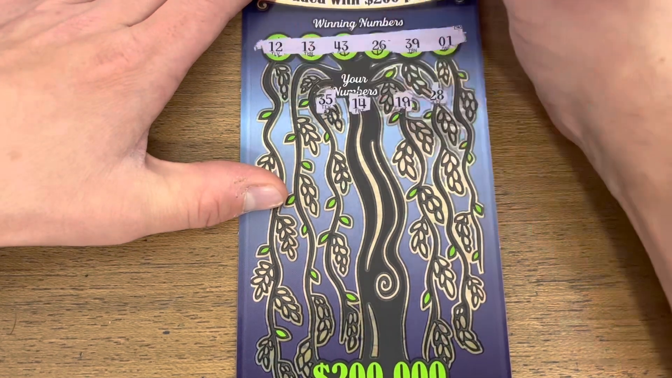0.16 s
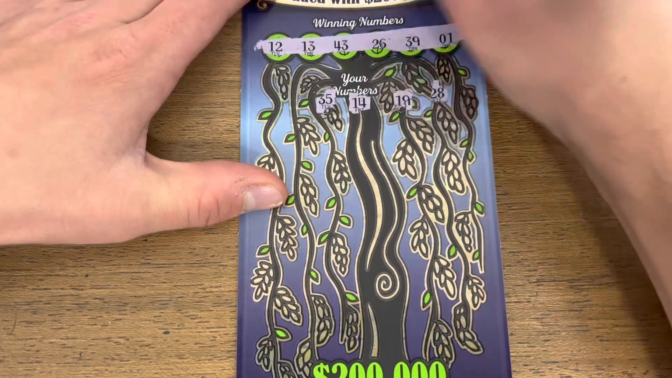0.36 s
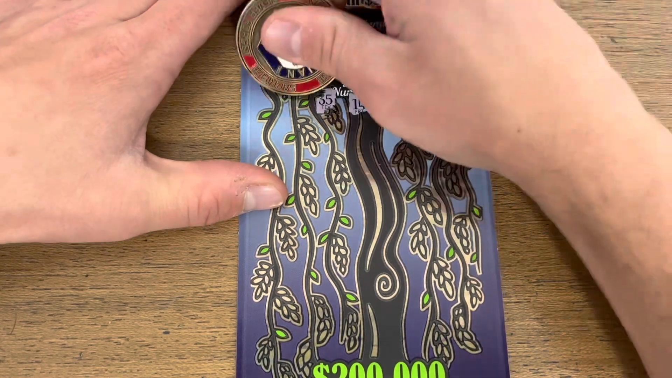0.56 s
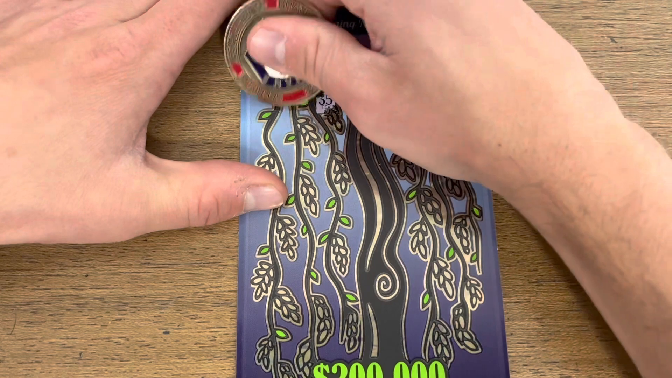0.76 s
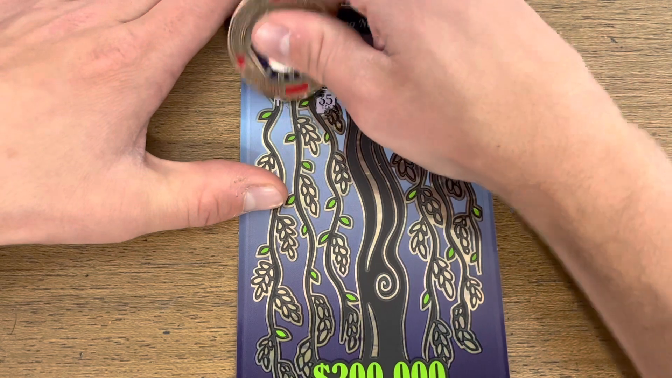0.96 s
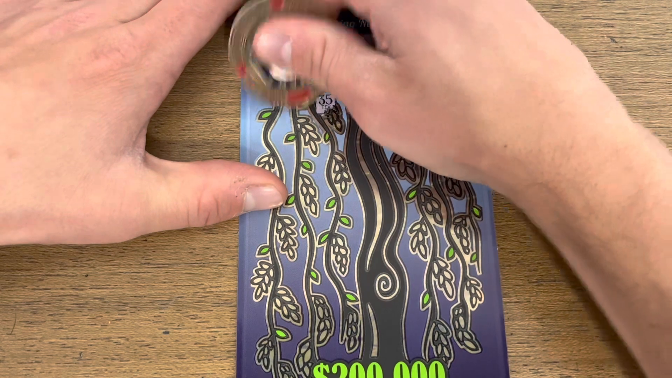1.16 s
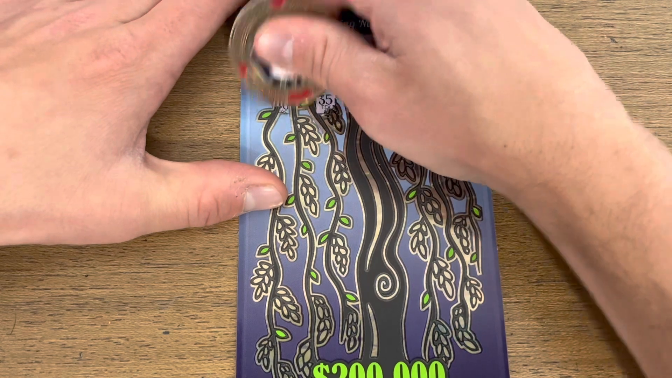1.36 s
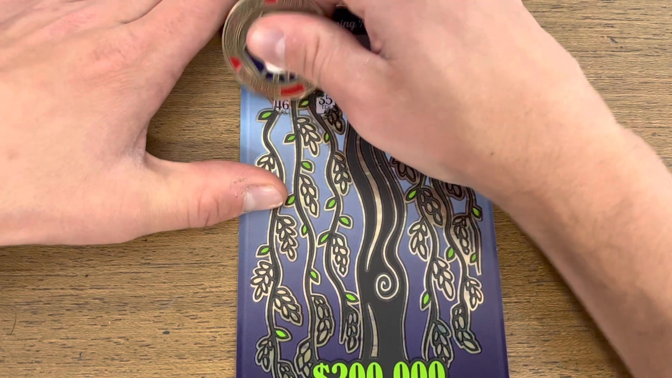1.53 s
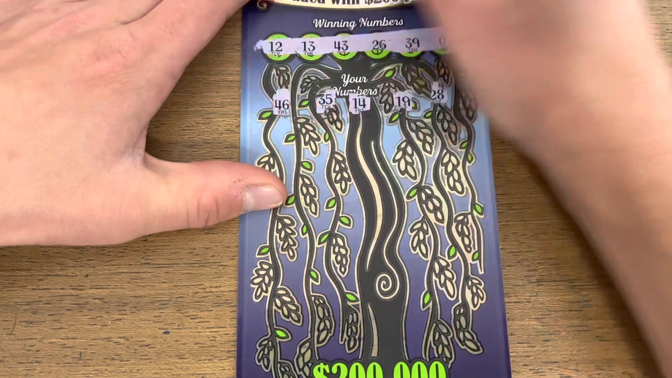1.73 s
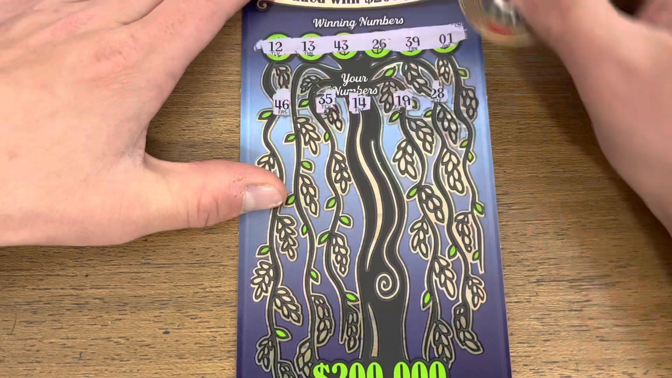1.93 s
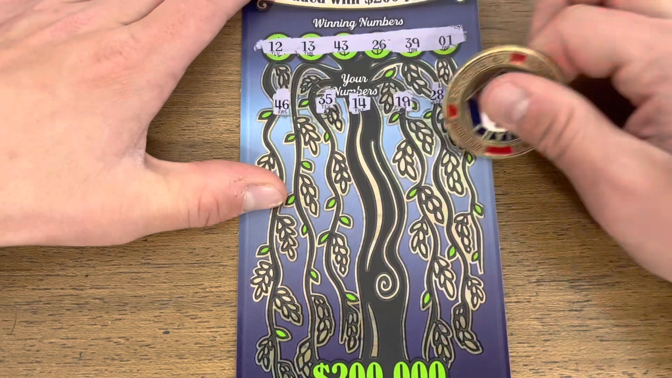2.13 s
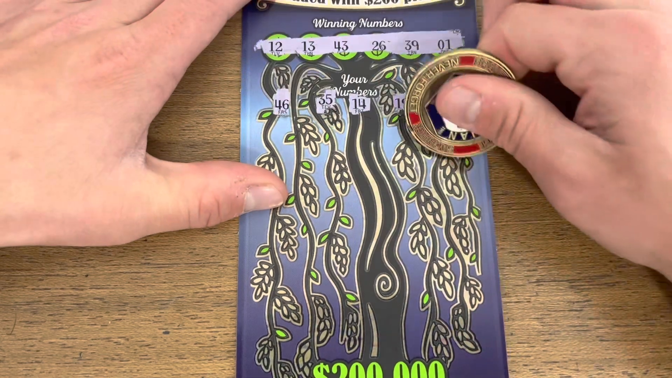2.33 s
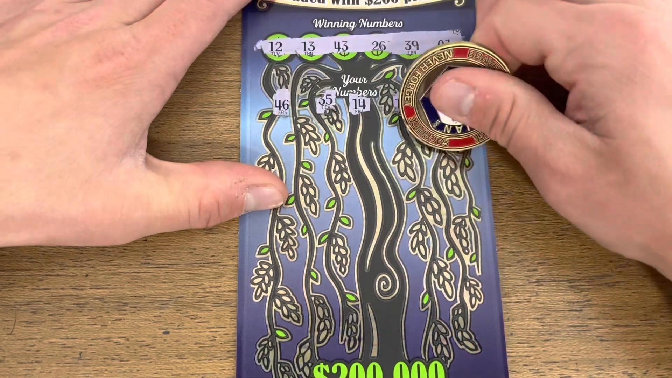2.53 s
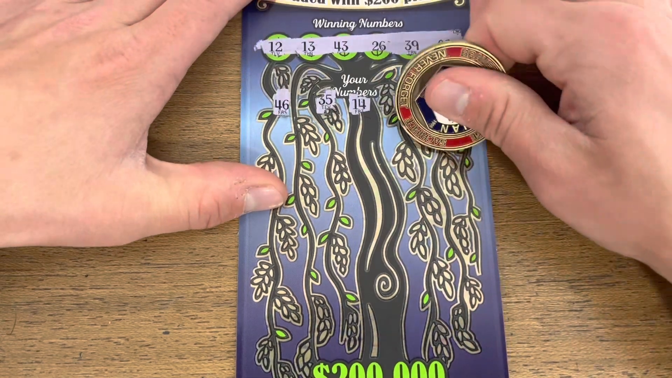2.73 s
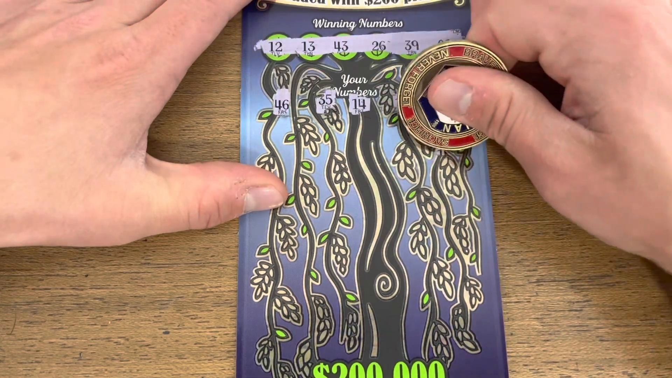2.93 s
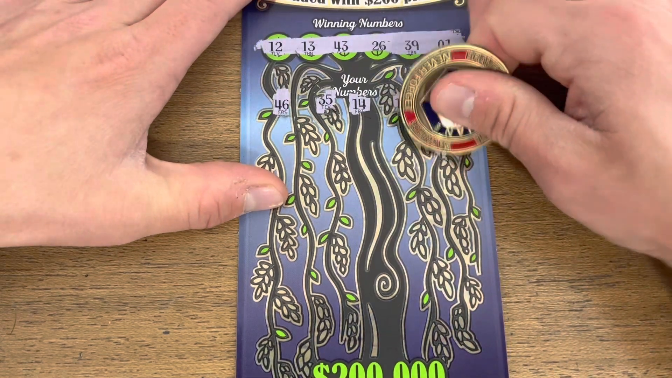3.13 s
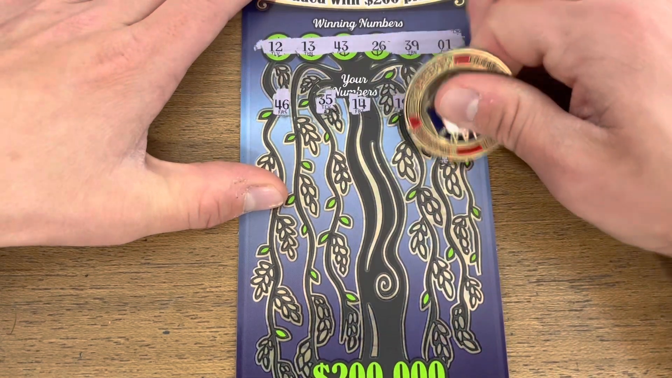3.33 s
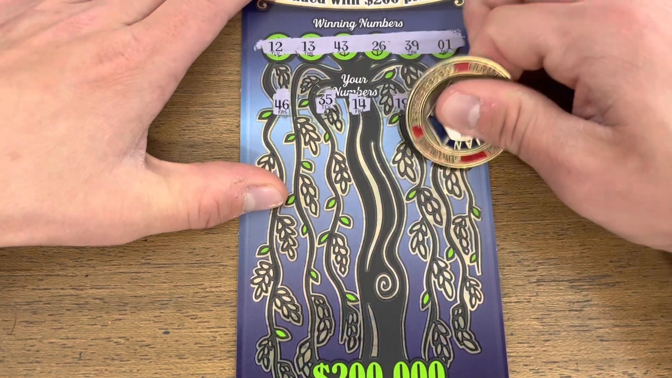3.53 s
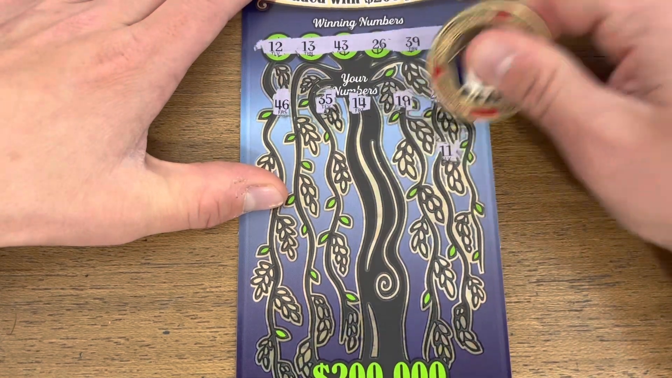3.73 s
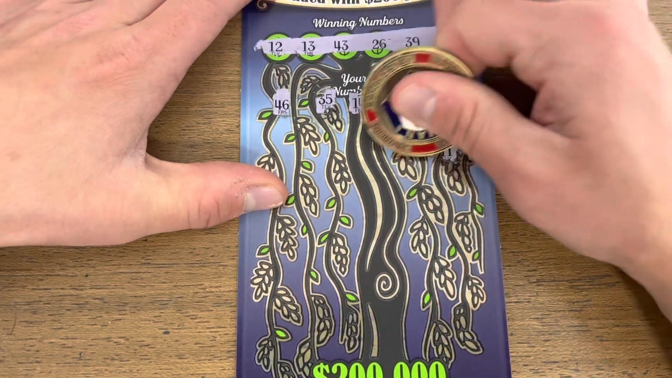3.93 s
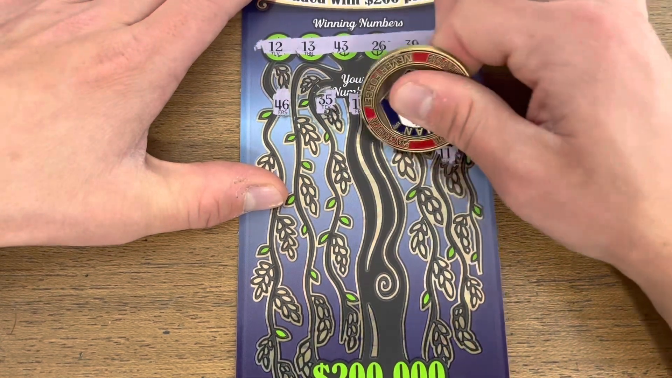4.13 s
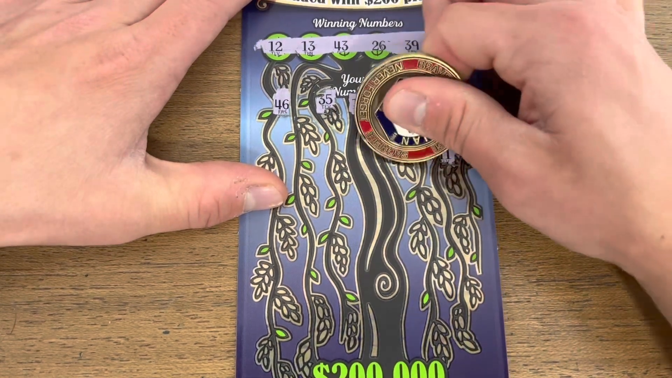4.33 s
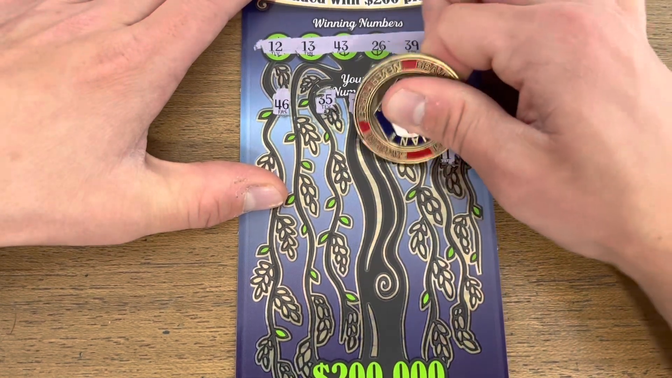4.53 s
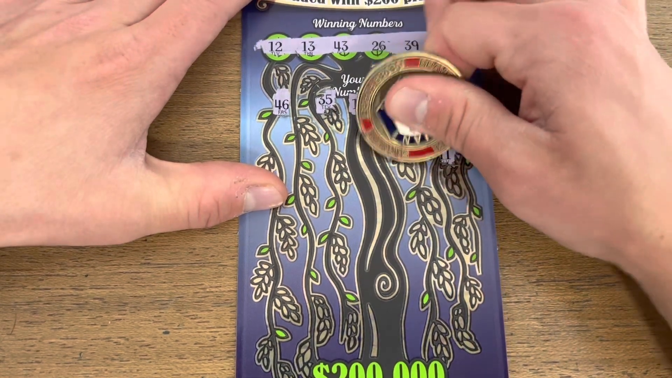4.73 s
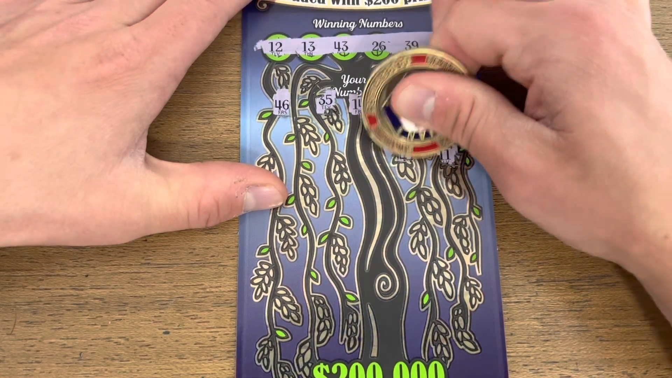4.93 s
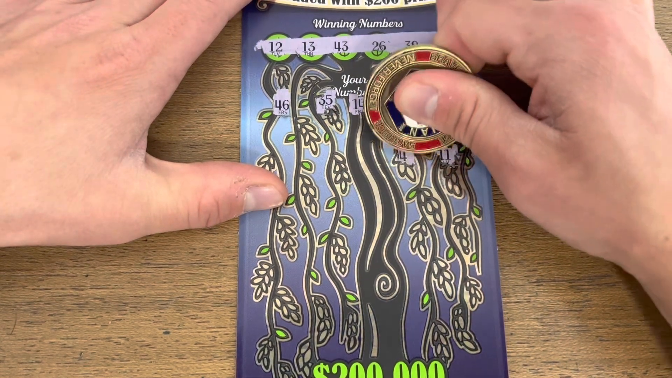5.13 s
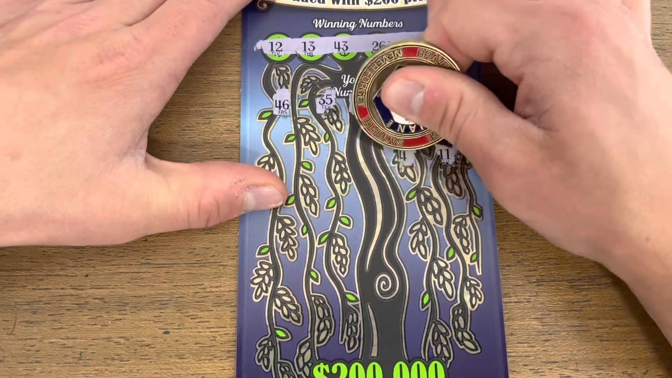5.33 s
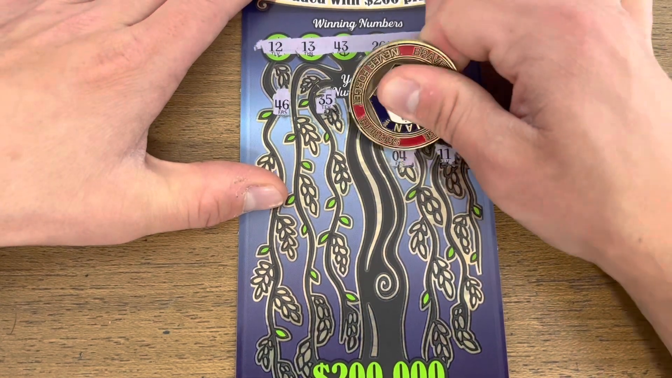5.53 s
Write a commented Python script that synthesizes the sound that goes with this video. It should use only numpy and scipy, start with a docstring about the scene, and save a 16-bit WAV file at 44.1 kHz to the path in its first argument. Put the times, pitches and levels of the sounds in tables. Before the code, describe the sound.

Close, dry, gritty scratching of a metal coin on paper card over wood, in rapid alternating strokes, broken by pauses with soft hand brushing.

```python
"""Coin scratching a lottery ticket

Three bouts of back-and-forth strokes on a paper ticket on a wooden table, in a small room, with a phone close by.
The rim sticks and slips: random kicks ring the modes of table and card, and the coating crumbles as a fine hiss.
Pulls dig in and drum the table, pushes rasp on the card; the hand brushes crumbs away with a hush of noise,
shifts the coin in its fingers with damped clicks and slides, and sets it down again with short knocks."""
import sys
import numpy as np
from scipy import signal
from scipy.fft import rfft, irfft
from scipy.io import wavfile

SR = 44100
rng = np.random.default_rng(int(sys.argv[2]) if len(sys.argv) > 2 else 0)


def digitize_waveform(pressure):
    """Quantize a signal to 16-bit integers and store it at the path in sys.argv[1].

    Rows of a 2-D input are taken as channels; values are limited to [-1, 1].
    """
    field = np.atleast_2d(pressure).T
    bounded = np.clip(field, -1, 1)
    quanta = np.round(bounded * 32767).astype(np.int16)
    wavfile.write(sys.argv[1], SR, quanta)


N = 250047  # samples in the scene
TAPS = 1024  # samples in a short response


def undb(db):
    """Decibels to gain."""
    return 10 ** (np.asarray(db) / 20)


def unit(x):
    """Scale to an energy of one."""
    return x / np.sqrt(np.sum(x ** 2) + 1e-18)


def on_bins(points, size):
    """A (pitch_hz, value) table read at the frequencies of a transform."""
    hz, value = np.transpose(points)
    bin_hz = np.arange(size // 2 + 1) * SR / size
    return np.interp(np.log(bin_hz + 1), np.log(hz), value)


def colour(x, points):
    """Filter by a (pitch_hz, level_db) table without shifting phase."""
    size = x.shape[-1]
    return irfft(rfft(x) * undb(on_bins(points, size)), size)


def response(points):
    """The causal impulse response of a (pitch_hz, level_db) table, scaled to an energy of one."""
    cepstrum = irfft(np.log(undb(on_bins(points, TAPS))))
    # folding the cepstrum forward gives minimum phase
    cepstrum[1:TAPS // 2] *= 2
    cepstrum[TAPS // 2 + 1:] = 0
    return unit(irfft(np.exp(rfft(cepstrum))))


def walk(size, rate):
    """Smooth chance around zero, with rate new random knots a second."""
    knots = rng.standard_normal(size // 20 + 2)
    return np.interp(np.arange(size) * rate / SR, np.arange(len(knots)), knots)


def grains(size, rate, spread_db):
    """Clicks at random moments, about rate a second, of very unequal size."""
    struck = rng.random(size) < rate / SR
    return struck * undb(spread_db * rng.standard_normal(size))


def grit(size, rate, spread_db):
    """Grains that push and pull alike."""
    return grains(size, rate, spread_db) * rng.choice([-1, 1], size)


def arch(length, power, skew=1):
    """Speed of a short movement: up from rest and back, fastest early when skew is below one."""
    size = int(length * SR)
    progress = (np.arange(size) + .5) / size
    return np.sin(np.pi * progress ** skew) ** power


def chatter(decay_s):
    """A contact that rattles to rest: noise that falls away exponentially."""
    return unit(rng.standard_normal(TAPS) * np.exp(-np.arange(TAPS) / (decay_s * SR)))


def linger(x, decay_s):
    """Give every part of a control an exponential tail."""
    return signal.lfilter([1], [1, -np.exp(-1 / (decay_s * SR))], np.pad(x, (0, TAPS)))


def add(out, s, force, ring, db, length):
    """Sound a force through a response at time s, with the energy of db held for length seconds."""
    sound = unit(signal.fftconvolve(force, ring)) * undb(db) * np.sqrt(length * SR)
    start = max(int(s * SR), 0)
    out[start:start + len(sound)] += sound[:max(N - start, 0)]


def spread(mid, side, apart_hz):
    """Left and right from mid and side; long waves reach both ports alike."""
    side = signal.sosfilt(signal.butter(2, apart_hz, "high", fs=SR, output="sos"), side)
    return mid + side * np.array([[1], [-1]])


# Colour of the quiet room: pitch_hz, level_db (relative)
ROOM_TONE_COLOUR = [(20, -16), (35, 7.5), (58, 16), (90, 1.5), (128, 4.5), (200, -6.5), (450, -21),
                    (1000, -28.5), (2300, -34), (3500, -33.5), (6000, -37.5), (13000, -32), (15000, -48)]
ROOM_TONE_DB = -56.5


def room_tone():
    """A low, almost steady rumble under a faint hiss: coloured noise, wider in the treble."""
    mid, side = rng.standard_normal((2, N))
    tone = colour(spread(mid, 0.51 * side, apart_hz=248), ROOM_TONE_COLOUR)
    return unit(tone) * np.sqrt(2 * N) * undb(ROOM_TONE_DB + 0.3 * walk(N, rate=5))


# The side of the hand sweeps crumbs off the card: start_s, length_s, level_db
HAND_SWEEPS = [(0, 0.095, -64.5), (1.619, 0.53, -59), (3.746, 0.14, -66.5)]
# Colour of skin on card: pitch_hz, level_db (relative)
SKIN_COLOUR = [(180, -19), (300, 2.5), (474, -1), (616, -5), (714, -2), (1470, -9), (4620, -8.5),
               (6950, -10.5), (8740, -11), (11700, -8.5), (13800, -11.5), (15000, -53)]


def sweeping(uneven_db=1, lift=4):
    """Skin glides over the card: a soft hush that wavers with the pressure and fades as the hand lifts."""
    out, skin = np.zeros(N), response(SKIN_COLOUR)
    for s, length, db in HAND_SWEEPS:
        size = int(length * SR)
        contact = arch(length, power=0.27) * (1 - np.linspace(0, 1, size) ** lift)
        pressure = undb(uneven_db * walk(size, rate=24))
        add(out, s, contact * pressure * rng.standard_normal(size), skin, db, length)
    return out


# Small sharp clicks of the coin in the grip: start_s, level_db
GRIP_CLICKS = [(0.1033, -32.5), (0.147, -44), (.177, -48.5), (0.2552, -46.5), (0.694, -66), (3.972, -55.5)]
# The coin slides between the fingers: start_s, length_s, level_db
GRIP_SLIDES = [(0.077, 0.021, -49.5), (0.103, 0.093, -54), (0.19, 0.06, -63.5), (0.447, 0.078, -50.5),
               (0.479, 0.015, -44.5), (2.068, 0.044, -68), (2.152, 0.041, -72), (2.192, 0.08, -73.5),
               (3.985, 0.19, -73)]
# Ring of the gripped coin: pitch_hz, slide_db, click_db (each relative)
GRIPPED_COIN = [(500, -17, -20.5), (2500, -21.5, -22.5), (2900, -11, -5), (3280, 1, 8), (3700, -6, -1.5),
                (4130, -10.5, -8.5), (4830, -16.5, -11.5), (5420, -23, -7), (6100, -17.5, -29),
                (12200, -21, -20.5), (15000, -30, -30)]


def fingering(uneven_db=3, tick_rate=2500, tick_spread_db=5):
    """The coin clicks and slides unevenly in the grip; the fingers damp its ring at once."""
    out = np.zeros(N)
    hz, slide_db, click_db = np.transpose(GRIPPED_COIN)
    for s, db in GRIP_CLICKS:
        add(out, s, chatter(decay_s=0.0011), response(np.c_[hz, click_db]), db, .005)
    for s, length, db in GRIP_SLIDES:
        speed = arch(length, power=0.34)
        size = len(speed)
        drive = speed * undb(uneven_db * walk(size, rate=75.6))
        ticks = drive * grit(size, tick_rate, tick_spread_db)
        add(out, s, ticks, response(np.c_[hz, slide_db]), db, length)
    return out


def body(modes, thud, ring_db):
    """A struck thing: its dead thud and one decaying sine for each mode."""
    t = np.arange(SR // 3) / SR
    rings = []
    for hz, db, t60 in modes:
        decay = np.exp(-np.log(1000) * t / t60)
        rings.append(undb(db) * np.sin(2 * np.pi * hz * t) * decay)
    return np.pad(response(thud), (0, len(t) - TAPS)), undb(ring_db) * unit(np.array(rings))


def touch(thing, place_db=3.5):
    """Response at one spot: each mode has its own sign and strength there."""
    thud, rings = thing
    count = len(rings)
    strength = rng.choice([-1, 1], count) * undb(place_db * rng.standard_normal(count))
    return thud + strength @ rings


# The table flexing as a whole: pitch_hz, level_db (relative), t60_s
TABLE_BOOM_MODES = [(128, 0, .16), (143, -6, .11), (178, -8, .1)]
# Its dead, quickly damped part: pitch_hz, level_db (relative)
TABLE_BOOM_THUD = [(30, -43.5), (70, -16), (100, -9), (132, 1.5), (200, -8.5), (400, -42), (1000, -62)]


def table_boom():
    """The lowest modes of the table, where it bends as one piece."""
    return body(TABLE_BOOM_MODES, TABLE_BOOM_THUD, ring_db=2)


# Boom of the table, changing with the spot that the coin presses on: start_s, level_db
BOOM_BY_TIME = [(.6, -1.5), (1.3, 2), (2.3, 4.5), (3.1, 4), (3.6, 0), (4.2, 0), (5.1, 3.5)]


def boom_at(s):
    """How many dB the table booms above its usual level at time s."""
    return np.interp(s, *np.transpose(BOOM_BY_TIME))


# Higher modes of the table top: pitch_hz, level_db (relative), t60_s
TABLE_TOP_MODES = [(273.8, 1.5, 0.19), (326.5, 1.5, 0.15), (382.5, -2.5, 0.13), (413.7, -1, 0.25),
                   (500.4, 2.5, 0.12), (556, -16, 0.19), (626.4, 0.5, 0.15), (728.4, -6, 0.26)]
# Its dead, quickly damped part: pitch_hz, level_db (relative)
TABLE_TOP_THUD = [(60, -37), (210, -14), (290, -4.5), (390, 3.5), (580, -3), (670, -8), (850, -8.5),
                  (1400, -60.5), (3000, -50.5)]


def table_top():
    """The drumming wood under the ticket."""
    return body(TABLE_TOP_MODES, TABLE_TOP_THUD, ring_db=-3.5)


# Modes of the card pressed under the coin: pitch_hz, level_db (relative), t60_s
PRESSED_CARD_MODES = [(790, -3, .1), (872, -1, .12), (990, 0, .1), (1168, -4, .1), (1325, -5, .1),
                      (1430, -5, .07), (1546, -7, .09), (1740, -10, .07), (1864, -12, .08),
                      (2200, -15, .06)]
# Its dead, quickly damped part: pitch_hz, level_db (relative)
PRESSED_CARD_THUD = [(250, -27), (680, -10), (920, 6.5), (1300, -2.5), (1800, -6), (2600, -24), (5000, -21),
                     (9000, -57)]


def ticket_card():
    """The card of the ticket, ringing briefly above the table's pitches."""
    return body(PRESSED_CARD_MODES, PRESSED_CARD_THUD, ring_db=-2.5)


# Hiss of the crumbling coating: pitch_hz, pull_db, push_db (each relative)
COATING_HISS = [(900, -47, -60), (1994, -4, -12.5), (2290, 8, -5.5), (2555, -3, -3), (3675, -6, -15.5),
                (3890, 6, -2.5), (4670, -3, -10), (5320, -6, -37), (5900, 3.5, 3), (6520, -9.5, -10),
                (9200, -1, -8), (13060, -4, -6.5), (13100, 1, 2), (14950, -4, -23.5)]


def coating(pulling, patch_db=3):
    """Response of the flaking coating; every patch has its own small resonances."""
    hz, pull_db, push_db = np.transpose(COATING_HISS)
    grid = np.arange(900, 15500, 240)  # Hz
    db = np.interp(grid, hz, pull_db if pulling else push_db)
    return response(np.c_[grid, db + patch_db * rng.standard_normal(len(grid))])


# The rim lands on the ticket or snaps off it: start_s, knock_db, tick_db
RIM_KNOCKS = [(0.386, -59, -63), (0.406, -57.5, -71), (0.553, -32, -65), (0.604, -32.5, -54),
              (0.61, -41.5, -44.5), (1.634, -62, -44), (2.2628, -29, -54), (2.41, -55.5, -74.5),
              (2.525, -57.5, -72), (2.865, -41, -54), (2.971, -36, -58), (3.228, -51, -47),
              (3.606, -54, -44.5), (4.129, -29, -56)]
KNOCK_BOOM_DB, KNOCK_CARD_DB = -7.5, -7  # table boom and card slap, relative to the knock


def knocks(boom, table, card, boom_push_s=0.0021, table_push_s=0.00083, card_push_s=0.00046,
           card_ring_db=-8):
    """Short pushes with some rattle drive table, card and coating; the rim damps the card's ring."""
    out = np.zeros(N)
    thud, rings = card
    damped_card = thud, undb(card_ring_db) * rings
    slap = np.exp(-np.arange(TAPS) / (card_push_s * SR))
    for s, knock_db, tick_db in RIM_KNOCKS:
        blow = signal.unit_impulse(TAPS) + .6 * chatter(decay_s=.012)
        table_push = np.convolve(blow, arch(table_push_s, power=0.84))
        boom_db = knock_db + KNOCK_BOOM_DB + boom_at(s)
        add(out, s, arch(boom_push_s, power=0.7), touch(boom), boom_db, .011)
        add(out, s, table_push, touch(table), knock_db, .011)
        add(out, s, slap, touch(damped_card), knock_db + KNOCK_CARD_DB, .005)
        add(out, s, chatter(decay_s=0.0021), coating(True), tick_db, .005)
    return out


RASP_PER_BITE = 0.75  # dB of card rasp for each dB of bite; the hiss follows the bite in full
RUN_UP_S, RUN_OUT_S = .0035, 0.0042  # the rim starts and stops gradually
BOOM_LAG_S = .0059  # the heavy table builds up late


def scratching(strokes, share_db, skew, pulling, boom, table, card, slip_rate=900, slip_db=4.5,
               crumb_rate=9000, crumb_db=4, pressure_db=2, burst=1.0, burst_s=0.0047):
    """Each slip of the rim kicks table and card and breaks off crumbs; a deeper bite rasps and hisses more."""
    out = np.zeros(N)
    boom_db, table_db, card_db, hiss_db = share_db
    for s, length, force_db, bite_db in strokes:
        start = s - RUN_UP_S
        speed = arch(RUN_UP_S + length + RUN_OUT_S, power=0.51, skew=skew)
        size = len(speed)
        drive = speed * undb(pressure_db * walk(size, rate=165))
        slips = grains(size, slip_rate, slip_db)
        kicks = (slips - slips.mean()) * drive
        # flakes come away just after each slip and go on scattering for a moment
        bursts = linger(slips * drive, burst_s)
        flow = unit(linger(drive, 0.0034)) + burst * unit(bursts)
        crumbs = flow * grit(len(flow), crumb_rate, crumb_db)
        rasp_db = force_db + card_db + RASP_PER_BITE * bite_db
        add(out, start + BOOM_LAG_S, kicks, touch(boom), force_db + boom_db + boom_at(s), length)
        add(out, start, kicks, touch(table), force_db + table_db, length)
        add(out, start, kicks, touch(card), rasp_db, length)
        add(out, start, crumbs, coating(pulling), force_db + hiss_db + bite_db, length)
    return out


# Strokes where the rim digs in: start_s, length_s, force_db, bite_db (bite into the coating)
PULL_STROKES = [(.701, 0.07, -48.5, -3.5), (.934, 0.041, -42.5, 5), (1.121, 0.047, -38.5, 2.5),
                (1.332, 0.034, -42.5, 5.5), (1.516, 0.037, -41, 0.5), (2.547, 0.043, -39, -13.5),
                (2.741, 0.038, -37, -4), (2.943, .035, -36.5, -2), (3.115, .043, -37.5, 0.5),
                (3.294, 0.049, -39.5, 0.5), (3.466, 0.057, -39.5, 3), (4.203, .048, -39, -1.5),
                (4.412, .038, -40, -2.5), (4.609, .038, -40, -0.5), (4.79, 0.039, -41, 5.5),
                (4.977, 0.05, -36.5, 1.5), (5.172, 0.042, -38.5, -3), (5.35, 0.047, -38.5, 3),
                (5.561, .04, -37, -3)]
# How a pull's force is shared out: boom_db, drumming_db, rasp_db, hiss_db
PULL_SHARES = (-4.5, 2.1, -7, -7.5)


def pulls(boom, table, card):
    """The rim digs in and drums the table top, a little faster early in the stroke."""
    return scratching(PULL_STROKES, PULL_SHARES, 0.98, True, boom, table, card)


# Strokes where the rim skates back: start_s, length_s, force_db, bite_db (bite into the coating)
PUSH_STROKES = [(.827, 0.066, -45.5, 4.5), (1.047, 0.041, -45.5, 0), (1.245, 0.026, -47, 13),
                (1.42, .038, -48.5, -0.5), (1.605, 0.02, -46, 3), (2.639, .027, -39, -10.5),
                (2.845, 0.025, -44, -8), (3.034, .027, -42.5, -4), (3.222, 0.03, -43, 3),
                (3.393, 0.036, -43.5, 4.5), (3.558, 0.039, -48.5, -6), (4.327, 0.035, -42.5, 2.5),
                (4.522, 0.019, -46, 3), (4.735, 0.017, -38, -8), (4.914, 0.01, -40, 5),
                (5.079, .023, -47.5, 2.5), (5.257, 0.044, -45, -3), (5.456, 0.038, -43.5, 12)]
# How a push's force is shared out: boom_db, drumming_db, rasp_db, hiss_db
PUSH_SHARES = (-12, -3, 0.16, -11)


def pushes(boom, table, card):
    """The rim skates back and rasps on the card, clearly fastest early in the stroke."""
    return scratching(PUSH_STROKES, PUSH_SHARES, 0.78, False, boom, table, card)


# The rim stays on the card between strokes: start_s, length_s, level_db
RUBBING_BOUTS = [(0.822, 0.86, -60.5), (2.621, 0.99, -61), (4.198, 2.5, -61)]
# Loose crumbs under the creeping rim: pitch_hz, level_db (relative)
CREEP_COLOUR = [(700, -14), (2200, 1), (3000, 5), (4400, 2), (6000, -17), (7500, -27), (13500, 6),
                (15000, -28)]


def rubbing(card, hiss_db=-10, uneven_db=3):
    """Through each bout the rim creeps over loose crumbs: random grains ring the card and hiss."""
    out = np.zeros(N)
    for s, length, db in RUBBING_BOUTS:
        contact = arch(length, power=0.23)
        size = len(contact)
        pressure = undb(uneven_db * walk(size, rate=34))
        creep = contact * grit(size, rate=4500, spread_db=4.0) * pressure
        add(out, s, creep, touch(card), db, length)
        add(out, s, creep, response(CREEP_COLOUR), db + hiss_db, length)
    return out


def squeak(s=2.908, length=0.042, from_hz=2300, to_hz=2750, db=-62):
    """For a moment the slips fall into step: a rough, rising chirp with a stronger octave."""
    out, speed = np.zeros(N), arch(length, power=1)
    size = len(speed)
    jitter = .08 * walk(size, rate=1400)
    pitch_hz = np.linspace(from_hz, to_hz, size) * (1 + jitter)
    phase = 2 * np.pi * np.cumsum(pitch_hz) / SR
    add(out, s, speed * (0.8 * np.sin(phase) + np.sin(2 * phase)), np.ones(1), db, length)
    return out


# The wide table top reaches the ports unequally: pitch_hz, level_db (of the difference)
TABLE_SPREAD = [(60, -9), (130, -28), (300, -5.5), (700, -9), (1400, 1.5), (2100, -16), (3200, -7.5),
                (5000, -4), (8300, -35), (10000, -6), (12000, -36)]


def table_width(x, count=4):
    """Early scatter from table top and hands, opposite at the two ports, along paths of wandering strength."""
    wide = colour(x, TABLE_SPREAD)
    paths = [signal.fftconvolve(wide * walk(N, rate=8), chatter(decay_s=0.0073))[:N] for _ in range(count)]
    return sum(paths) / np.sqrt(count) * np.array([[1], [-1]])


# Reverberation of the small room: pitch_hz, level_db
ROOM_COLOUR = [(60, 2.5), (250, -5), (1000, -8), (3000, -8), (7000, -14), (13000, -27)]
ROOM_T60_LOW_S, ROOM_T60_HIGH_S = 0.44, 0.34


def room(x, delay=0.0051, split_hz=3000):
    """A short diffuse tail of decaying noise whose treble dies first."""
    t = np.arange(SR // 2) / SR
    noise = spread(*rng.standard_normal((2, len(t))), apart_hz=238)
    low = signal.sosfilt(signal.butter(2, split_hz, fs=SR, output="sos"), noise)
    high = signal.sosfilt(signal.butter(2, split_hz, "high", fs=SR, output="sos"), noise)
    low_tail = low * np.exp(-np.log(1000) * t / ROOM_T60_LOW_S)
    high_tail = high * np.exp(-np.log(1000) * t / ROOM_T60_HIGH_S)
    # silent until the delay, then fading in over as long again
    tail = (low_tail - high_tail) * np.clip(t / delay - 1, 0, 1)
    return np.array([signal.fftconvolve(colour(x, ROOM_COLOUR), unit(side))[:N] for side in tail])


def scene(hand_room_db=-10):
    """Coin, card and hand on the table; the wide table top feeds the room more than the hand does."""
    boom, table, card = table_boom(), table_top(), ticket_card()
    hand = sweeping() + fingering()
    strokes = pulls(boom, table, card) + pushes(boom, table, card)
    coin = knocks(boom, table, card) + strokes + rubbing(card) + squeak()
    direct = coin + hand
    reverberation = room(coin + undb(hand_room_db) * hand)
    return room_tone() + direct + table_width(direct) + reverberation


# Phase between the phone's two ports: pitch_hz, lead_rad (left leads)
PORT_LEAD = [(200, 0), (900, .5), (1300, 1.6), (1800, .2), (3000, .6), (5000, .2), (6200, -1.1),
             (6800, -1.4), (8000, -3.05), (8700, -3.25), (10000, -4.5), (11500, -6.2), (13000, -6.8),
             (14500, -9)]
# Level between the ports: pitch_hz, level_db (left minus right)
PORT_LEVEL = [(130, 0.5), (400, 2.5), (1000, 1), (1300, 0.5), (2100, 1.5), (3400, 3.5), (4300, 2.5),
              (5000, 4), (8000, 0)]


def ports(x):
    """Each microphone port has its own phase and level, half the difference applied to either side."""
    half = np.exp(.5j * on_bins(PORT_LEAD, N)) * undb(on_bins(PORT_LEVEL, N) / 2)
    return irfft(rfft(x) * np.array([half, 1 / half]), N)


# Treble colour of both ports: pitch_hz, level_db
PORT_TREBLE = [(7000, -0.5), (8000, -6.5), (8700, -8.5), (9500, -3), (10300, -3.5), (13500, -6),
               (14300, -11), (15500, -14)]
TOP_HZ = 15500


def record(dry):
    """The close phone: its ports colour the treble, and it cuts the deepest bass and the top."""
    heard = colour(ports(dry), PORT_TREBLE)
    heard = signal.sosfilt(signal.butter(4, 40, "high", fs=SR, output="sos"), heard)
    return signal.sosfilt(signal.ellip(8, .2, 70, TOP_HZ, fs=SR, output="sos"), heard)


dry = scene()
out = record(dry)
digitize_waveform(out)
```